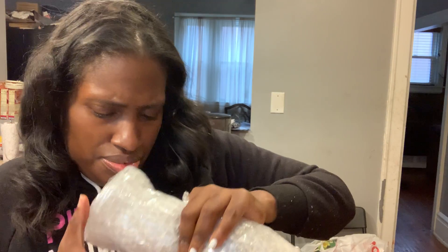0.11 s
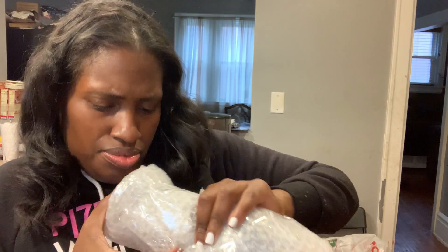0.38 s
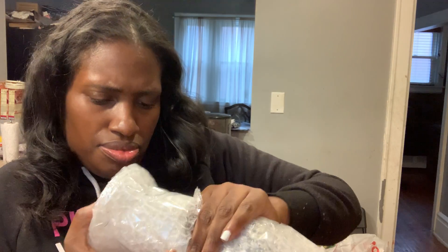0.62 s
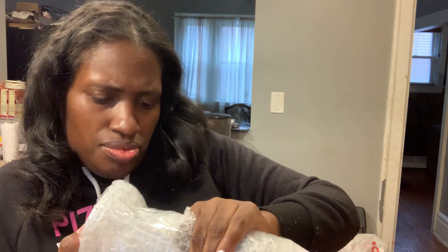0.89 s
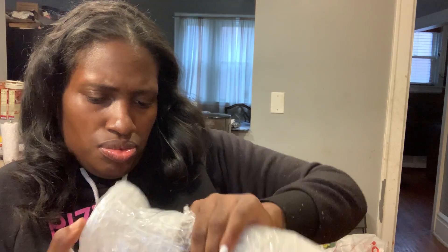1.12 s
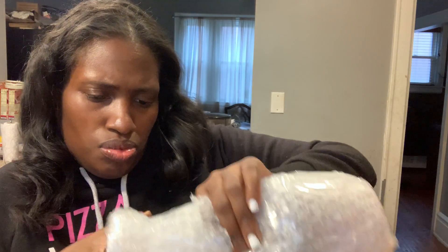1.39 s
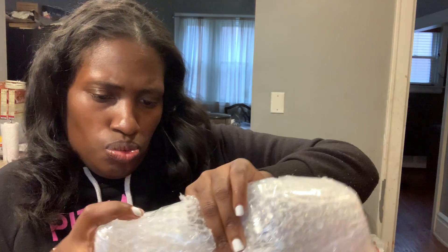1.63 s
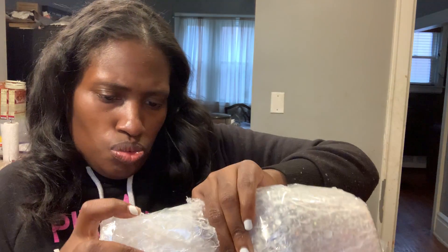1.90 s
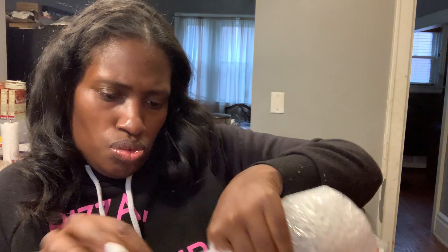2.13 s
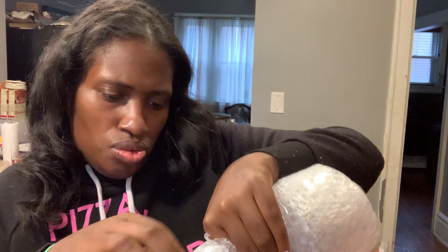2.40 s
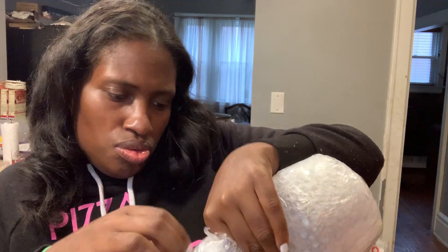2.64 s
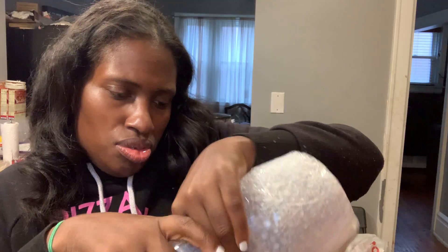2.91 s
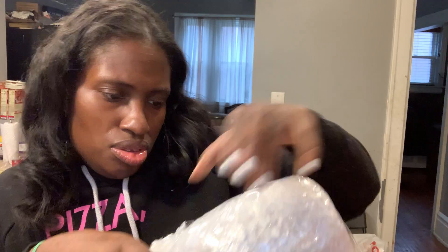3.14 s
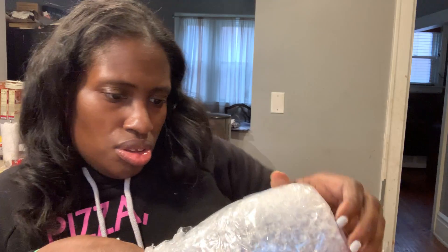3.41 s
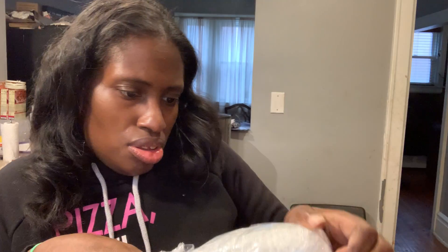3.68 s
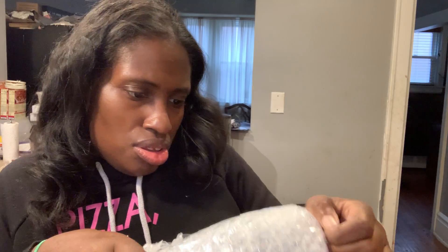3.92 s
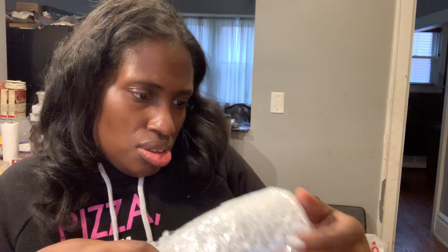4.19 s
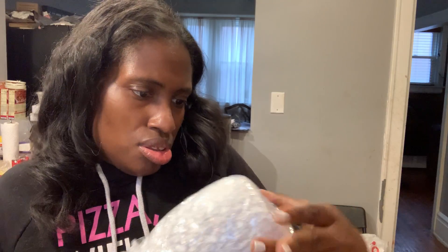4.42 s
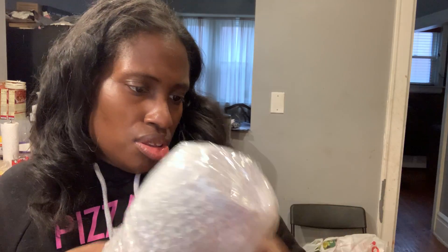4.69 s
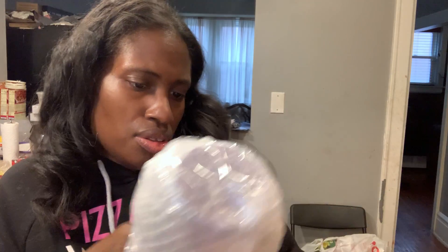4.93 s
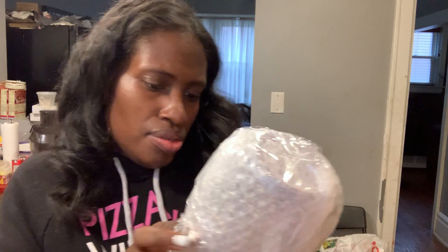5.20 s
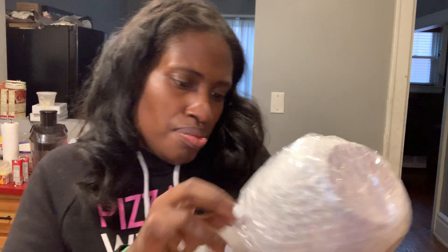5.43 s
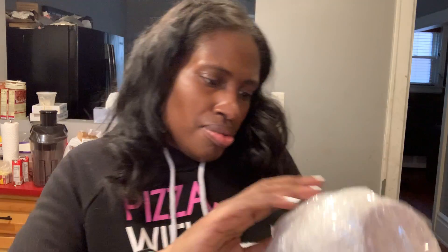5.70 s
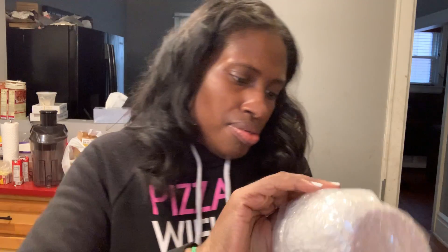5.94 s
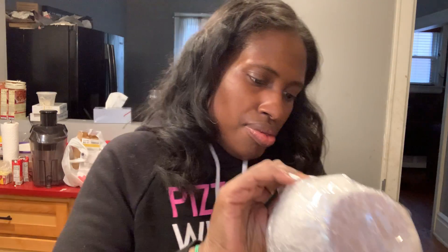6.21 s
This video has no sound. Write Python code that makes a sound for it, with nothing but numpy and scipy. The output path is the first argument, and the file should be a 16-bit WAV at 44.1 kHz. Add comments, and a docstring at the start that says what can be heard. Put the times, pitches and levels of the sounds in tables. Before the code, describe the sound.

Hands unwrap an object covered in bubble wrap, close to the microphone in a small, dry room. Bright rustling comes in short uneven bursts, full of tiny crackles and sharp snaps. Dull little pops and gritty finger rubs mix in, and the object bumps the table with low thuds. Near the end the snaps crowd together and grow loudest.

```python
"""Hands pull bubble wrap off an object on a table, close to two microphone ports in a small room.
From the start the film rustles, thousands of tiny cracks fused with hiss, as the object rubs the table: noise
in table and object resonances. Sharp snaps (noise bursts) and dull pops (damped tones) join at once.
Gritty rubs over the bubbles (narrow noise) follow from 0.4 s and knocks on the table (low damped tones)
from 0.7 s to 5.1 s. Loud snaps crowd together from 5.8 s to the end."""
import sys
import numpy as np
from scipy import signal
from scipy.fft import rfft, irfft
from scipy.io import wavfile
from scipy.ndimage import uniform_filter1d

SR = 44100
rng = np.random.default_rng(int(sys.argv[2]) if len(sys.argv) > 2 else 0)


def transcribe(u):
    """Save the signal u as a 16-bit wav file named by the first command-line argument.

    u: samples, shape (n,) or (channels, n), limited to [-1, 1]; the rate is SR.
    q: integer samples, one column per channel.
    """
    v = np.clip(np.atleast_2d(u).T, -1, 1)
    q = np.round(v * 32767).astype(np.int16)
    wavfile.write(sys.argv[1], SR, q)


def natural_amplitude(level_db):
    """Convert a level in decibels to a linear amplitude factor, elementwise."""
    exponent = np.asarray(level_db, float) / 20
    return 10 ** exponent


N = 278712

# Colour of the film up to 15700 Hz; the last three rows are a steep treble cut, not the film's own colour.
# Each row: frequency in Hz, relative level in dB.
FILM_AND_CUT = [(200, -16), (500, -10), (1300, -4), (1700, -4), (3000, 1.5), (4900, 3), (6500, -0.5),
                (9000, 9), (12000, 6), (14000, 7), (15700, 6), (16100, -63), (16800, -55), (17100, -56.5)]
# The two microphone ports. Each row: frequency in Hz, phase by which the right leads in radians,
# wander of that lead in radians, left minus right level in dB.
PORT_RESPONSE = [(40, .7, .3, -2.5), (90, .65, .3, -2.5), (170, .5, .3, -.3), (300, .6, .6, 0),
                 (700, 1.1, 1.0, -5.5), (1500, 1.2, .7, -3), (3000, 2, .8, -1.5), (4600, 2.2, 1.2, -.5),
                 (5800, 4.7, 1.1, -.7), (7300, 4.3, .35, 0), (8200, 3.5, .05, 0), (9000, 3.14, .02, 0),
                 (9800, 2.7, .06, 0), (11500, 1.6, .35, 0), (14000, 0, .12, 0), (16000, -.9, .3, 0)]


def evened(x):
    """Scales to rms 1."""
    return x / np.sqrt(np.mean(x ** 2) + 1e-20)


def curves(rows):
    """Each dB column as a gain for every sample."""
    s, *columns = np.transpose(rows)
    return natural_amplitude([np.interp(np.arange(N) / SR, s, c) for c in columns])


def add(mix, s, sound):
    """Mixes a sound in at time s."""
    part = mix[max(round(s * SR), 0):][:len(sound)]
    part += sound[:len(part)]


def swells(steady, s, levels_db, rise, fall):
    """Adds in power, to each steady gain, swells that climb to a peak and sink from it at a constant dB rate."""
    t = np.arange(0, N / SR + .002, .001)
    late = t - s[:, None]
    rise, fall = rise.clip(.001)[:, None], fall.clip(.001)[:, None]  # 1 ms at the least
    shape = natural_amplitude(-40 * np.where(late < 0, -late / rise, late / fall))  # in power: 20 dB per rise or fall
    power = natural_amplitude(2 * np.asarray(levels_db)) @ shape
    return np.sqrt(steady ** 2 + [np.interp(np.arange(N) / SR, t, p) for p in power])


def film_parts(x, colour=FILM_AND_CUT):
    """Filters x by a colour curve and splits it into dull, middle and bright parts."""
    size = x.shape[-1]
    hz = np.fft.rfftfreq(size, 1 / SR) + 1
    f, db = np.transpose(colour)
    low, high = (1 / (1 + (hz / edge_hz) ** 4) for edge_hz in (1600, 7000))
    spectrum = rfft(x) * natural_amplitude(np.interp(np.log(hz), np.log(f), db))
    return np.array([irfft(spectrum * share, size) for share in (low, high - low, 1 - high)])


def stirring():
    """Gains of the dull, middle and bright rustle: steady handling plus crumples."""
    # Steady handling between crumples. Each row: time in seconds, dull, middle and bright level in dB.
    handling = [(0, -46.5, -68, -58), (.31, -57, -69.5, -74), (.6, -59.5, -55.5, -52.5),
                (1.04, -64, -58, -59), (1.45, -71.5, -69, -76), (1.62, -64, -64, -61),
                (2.03, -63, -67, -79), (2.2, -63.5, -48.5, -61), (2.43, -65.5, -77, -70),
                (2.65, -64, -61.5, -72.5), (2.9, -56.5, -54, -66), (3.27, -65, -59, -65),
                (3.45, -72, -68, -59), (3.65, -67, -47, -58.5), (3.9, -64.5, -66, -74),
                (4.2, -62, -58, -59), (4.6, -63.5, -55, -56), (4.97, -57.5, -54, -58.5),
                (5.42, -60, -55, -55.5), (5.8, -57, -59, -60), (6.04, -55, -46, -54), (6.32, -56, -46, -47)]
    # Crumples of the film. Each row: peak time in seconds, dull, middle and bright level in dB,
    # seconds to rise 20 dB, seconds to fall 20 dB (anything under 0.001 acts as 0.001).
    crumples = [(.0, -45, -53.5, -51, .05, 0.1), (.1, -51, -56, -46, 0.3, 0), (.235, -70, -54, -71, 6, 8),
                (.28, -61, -60, -52, 0.15, 0.2), (.334, -57, -39, -60.5, -0.08, 0),
                (0.391, -31, -51, -49, -0.06, -0.02), (.44, -53.5, -59, -63.5, 0.4, 0.6),
                (.52, -65, -51.5, -60, 0.7, 0.8), (0.675, -52, -63, -64, 0.2, 0.4),
                (.753, -53, -40, -45, -0.1, 0), (0.775, -42, -41.5, -34.5, -0.01, 0.06),
                (0.945, -37.5, -41.5, -36, 0.0659, -0.0144), (1.127, -56, -40, -41, -0.05, 0.03),
                (1.161, -39, -43, -40, 0, 0.06), (1.189, -42, -31, -36, 0.0142, 0.0528),
                (1.228, -31.5, -38, -27, -0.02, -0.0278), (1.274, -43.5, -37, -37.5, 0.09, 0.02),
                (1.315, -27, -38, -49, 0.0048, -0.0143), (1.336, -48, -54, -61.5, -0.12, 0.06),
                (1.481, -51.5, -57, -81, -0.04, 0.03), (1.535, -42.5, -64, -55, 0.04, 0),
                (1.61, -54.5, -61, -59, 0.05, 0.08), (1.695, -64.5, -56, -54, 0, 0.55),
                (1.8, -62.5, -51, -51, -0.08, 0), (2.064, -55.5, -50.5, -53, -0.44, 0.02),
                (2.109, -42, -40.5, -40.5, 0.0157, 0.05), (2.241, -40.5, -41, -33, 0.0447, 0),
                (2.31, -46.5, -51.5, -52, 0.14, 0.01), (2.56, -47, -47.5, -47.5, 0.01, 0.0879),
                (2.68, -53, -55, -55, -0.2, 0.5), (2.728, -45, -40, -53, -0.05, 0),
                (2.812, -54.5, -47.5, -52, -0.3, 0.14), (2.914, -53.5, -52.5, -52, -0.14, 0.23),
                (3.026, -50, -41.5, -43.5, -0.06, 0.3), (3.096, -36, -48.5, -42.5, 0.09, 0.075),
                (3.158, -60, -49, -44.5, -0.1, 0.0755), (3.237, -69, -45, -50, -0.08, -0.05),
                (3.299, -70, -40, -39, -0.04, 0.06), (3.348, -54, -40.5, -43.5, 0.04, 0.05),
                (3.488, -46, -47, -45, -0.03, 0.2), (3.525, -47, -42, -39.5, 0.02, 0.26),
                (3.593, -42, -37, -33.5, 0.04, 0.08), (3.669, -53.5, -46, -60, -0.25, 0.1),
                (3.796, -59, -62, -55, 0.5, 0.14), (3.95, -67, -50, -48, -0.04, 0.2),
                (4.02, -67, -47.5, -46.5, -0.55, 0.14), (4.054, -42, -33.5, -32.5, -0.04, 0.0638),
                (4.24, -54, -45, -44, 0.04, 0.02), (4.476, -59, -47, -50, 0.28, 0.1),
                (4.63, -59.5, -53, -53.5, 0.1, 1), (4.82, -54.5, -44.5, -47, 0.12, 0.04),
                (4.845, -57, -47, -54, .06, 0.02), (4.87, -55, -45, -49.5, 0.06, 0.15),
                (5.02, -50.5, -49, -45, 0.0631, 0.12), (5.087, -38, -43, -40, 0.06, 0.0254),
                (5.13, -58, -47, -59, 0.13, 0.08), (5.24, -54, -53.5, -52, 0.23, 1.3),
                (5.451, -73, -48, -49, -0.1, 0.9), (5.529, -45, -44, -40, -0.01, 0.03),
                (5.68, -44, -54, -42, -0.11, 0.15), (5.725, -35.5, -49, -53, -0.01, .01),
                (5.856, -42, -34, -39.5, 0.02, 0.1), (5.941, -48, -42, -43, 0.1, 0),
                (6.069, -41.5, -33, -40, -0.0453, 0.47), (6.154, -38, -29.5, -36, -0.0645, 0.08),
                (6.215, -36, -28.5, -40, -0.034, 0.04), (6.318, -62, -44, -60.5, 0.27, -6)]
    s, *levels_db, rise, fall = np.transpose(crumples)
    return swells(curves(handling), s, levels_db, rise, fall)


def patchy(x, depth_db=1.8):
    """The colour drifts at random in patches of time and pitch."""
    hz, t, z = signal.stft(x, SR, nperseg=512, noverlap=384)
    patches = rng.standard_normal((len(t), len(hz))).T
    patches = uniform_filter1d(patches, size=6, axis=0)
    patches = evened(uniform_filter1d(patches, size=24, axis=1))
    return signal.istft(z * natural_amplitude(depth_db * patches), SR, nperseg=512, noverlap=384)[1][:, :N]


def rustle(stir, kinds=24):
    """Countless small cracks, each kind with its own pitch and length, in clumps, fused with a rubbing hiss."""
    cracks_per_s, spread_db, hiss = 2000, 3.8, 0.85
    clumps_per_s, clump_s, clump_db = 120, .008, 1.8

    starts = rng.exponential(1, N) * (rng.random(N) < clumps_per_s / SR)
    clumps = signal.lfilter([1], [1, -np.exp(-1 / (clump_s * SR))], starts)  # sudden start, slow end
    clumps = natural_amplitude((clump_db * evened(clumps - clumps.mean())).clip(-9, 9))

    size = natural_amplitude(spread_db * np.minimum(rng.exponential(1, N), 5))
    size = size * (rng.random(N) < cracks_per_s / SR)
    kind = rng.integers(0, kinds, N)
    t = np.arange(512) / SR
    cracks = np.zeros(N)
    for k, hz in enumerate(np.geomspace(500, 15000, kinds)):
        decay = np.exp(-t * hz / rng.uniform(.5, 1.5))  # dies within a cycle or two
        tone = evened(np.sin(2 * np.pi * hz * t) * decay) * np.sqrt(hz / 4000)
        click = evened(rng.standard_normal(512) * np.exp(-t / .0003))
        cracks += signal.oaconvolve(size * (kind == k), tone + 2.3 * click)[:N]

    # the hiss comes from the whole sheet, so the ports share it only where the lead holds still
    f, _, wander, _ = np.transpose(PORT_RESPONSE)
    shared = np.exp(-3. * np.interp(np.fft.rfftfreq(N, 1 / SR), f, wander) ** 2)
    common, *own = rfft(rng.standard_normal((3, N)))
    spread_hiss = irfft(np.sqrt(shared) * common + np.sqrt(1 - shared) * np.array(own), N)

    x = patchy((evened(cracks) + hiss * spread_hiss) * clumps)
    return sum(gain * evened(part) for gain, part in zip(stir, film_parts(x)))


def ring(x, modes):
    """Sum of resonances, each applied twice, at rms 1."""
    out = 0
    for hz, width, db in modes:
        b, a = signal.iirpeak(hz, hz / width, SR)
        once = signal.lfilter(b, a, x)
        out = out + natural_amplitude(db) * signal.lfilter(b, a, once)
    return evened(out)


def table_rubbing():
    """Lumpy friction noise drives the resonances of the table top and of the hollow object."""
    # Table top, then wrapped object. Each row: resonance in Hz, width of one filter pass in Hz, relative dB.
    boom_modes = [(58.2, 19.4, 2), (89.5, 11.8, -0.5), (113.4, 37, -10)]
    hollow_modes = [(197.3, 37.6, -3.5), (245, 44, 0), (300, 51, 0), (390, 112, -7)]
    # Resting contact with the table. Each row: time in seconds, boom level in dB, hollow ring level in dB.
    resting = [(0, -59, -63.5), (.65, -54.5, -76), (1.05, -50, -63), (1.2, -72, -69), (1.45, -78, -65),
               (2.0, -64, -66), (2.4, -56.5, -57), (2.85, -62, -72), (3.35, -59, -61.5), (3.9, -53.5, -69),
               (4.5, -65, -64.5), (5.0, -58, -65.5), (5.2, -53, -61), (5.55, -59.5, -57),
               (6.32, -63.5, -55)]
    # Shoves across the table. Each row: peak time in seconds, boom level in dB, hollow ring level in dB,
    # seconds to rise 20 dB, seconds to fall 20 dB (anything under 0.001 acts as 0.001).
    shoves = [(.0, -30.5, -45, .05, 0.06), (.23, -53.5, -60, 3, -0.2), (.37, -70, -50, 0.2, 0.5),
              (.56, -51, -70, .01, 2), (0.684, -29, -46, -0.03, -0.05), (.78, -53, -48, 0.2, 0.2),
              (.9, -51, -44, -0.26, 0.13), (0.927, -51, -43, -0.08, 0.08), (1.0, -52.5, -70.5, 0, -0.5),
              (1.264, -40, -27, 0.0136, 0.0944), (1.29, -47, -42, 0.07, -0.08),
              (1.318, -34, -35.5, 0.08, 0.07), (1.49, -59, -53, 0.9, 0.27), (1.539, -35.5, -47, 0, 0.08),
              (2.23, -32.5, -43, 0.02, 0.1267), (2.3, -39.5, -55.5, -0.03, 0),
              (2.55, -59, -50.5, 0.05, 0.2821), (2.73, -51, -44.5, 0.06, 0.02),
              (2.938, -36.5, -45.5, -0.1, 0.08), (3.1, -52, -56.5, -0.2, 0.7),
              (3.54, -41.5, -46, -0.02, 0.25), (3.63, -43.5, -41, -0.26, 0.1), (3.69, -53, -58.5, .01, 0.3),
              (3.73, -59.5, -69, 1.5, 0), (4.07, -54, -52, 0.1, 0.2), (4.24, -51.5, -57, -0.4, 0.04),
              (4.35, -47.5, -84, 0.2, 0.16), (4.91, -56, -60, 0, -0.3), (5.078, -29.5, -38, -0.09, 0.13),
              (5.83, -46.5, -73, 0.2, 0.15), (6.04, -55, -76, 1.2, -1.5), (6.15, -62, -50, -0.9, -0.7)]
    lumps = natural_amplitude(1.14 * evened(uniform_filter1d(rng.standard_normal((2, N)), 900)))
    drive = rng.standard_normal((2, N)) * lumps
    s, *levels_db, rise, fall = np.transpose(shoves)
    boom, hollow = swells(curves(resting), s, levels_db, rise, fall)
    return boom * ring(drive[0], boom_modes) + hollow * ring(drive[1], hollow_modes)


def room(x, turn_s=.11):
    """Sparse taps, treble dying first; three random echoes blend in turn so no fixed colouring builds up."""
    # Reverberation of the small room. Each row: frequency in Hz, time to fall 60 dB in seconds.
    decay_times = [(300, 0.14), (2000, 0.23), (6000, 0.094), (14000, 0.043)]
    taps = np.zeros((3, SR // 2))
    slots = np.arange(200, SR // 2 - 20, 20)
    at = slots + rng.integers(0, 20, (3, len(slots)))
    np.put_along_axis(taps, at, rng.choice([-1., 1.], at.shape), 1)
    hz, t, z = signal.stft(taps, SR, nperseg=256)
    f, t60 = np.transpose(decay_times)
    fade = natural_amplitude(-60 * t / np.interp(hz, f, t60)[:, None])
    tails = signal.istft(z * fade, SR, nperseg=256)[1]
    phase = np.arange(N) / SR / turn_s + np.arange(3)[:, None]
    turns = np.cos(np.pi * phase / 3) * np.sqrt(2 / 3)  # the three powers always sum to 1
    return signal.oaconvolve(x * turns, tails / np.linalg.norm(tails[0]), axes=1).sum(0)[:N]


def crease_flips(rows, crack_s=0.00039, shiver_s=0.0048, shiver_db=-12):
    """A crease flips: a crack under a millisecond, then a short shiver; duller parts last longer."""
    # Treble cut for the snaps, which reach higher than the rustle. Each row: frequency in Hz, relative dB.
    snap_cut = [(16700, -30), (17100, -48)]
    out, lead = np.zeros(N), 256
    t = (np.arange(2048) - lead) / SR
    noise = rng.standard_normal((len(rows), 2048))
    noise[:, lead] = 4.5  # the flip itself
    parts = []
    for k, longer in enumerate((2.6, 1.4, 1)):  # dull, middle, bright
        rise = np.exp(np.minimum(t, 0) / (0.079 * crack_s * longer))
        crack = np.exp(-t.clip(0) / (crack_s * longer))
        shiver = natural_amplitude(shiver_db) * np.exp(-t.clip(0) / (shiver_s * longer))
        part = film_parts(noise * rise * (crack + shiver), FILM_AND_CUT[:-3] + snap_cut)[k]
        parts.append(part / abs(part).max(1, keepdims=True))
    for k, (s, bright_db, middle_db, dull_db) in enumerate(rows):
        sound = sum(natural_amplitude(db) * p[k] for db, p in zip((dull_db, middle_db, bright_db), parts))
        add(out, s - lead / SR, sound)
    return out


def loud_snaps():
    """The loud snaps of the film, as creases flip."""
    # Each row: time in seconds, bright, middle and dull peak in dB.
    snap_rows = [(.0367, -12, -42, -50), (.071, -25, -42.5, -44), (.0752, -24, -27.5, -29.5),
                 (.1054, -18, -32, -39), (.228, -55, -22.5, -23.5), (.2739, -25, -38.5, -54),
                 (.3272, -39, -13.5, -60.5), (.3317, -27, -25, -34), (.3685, -26, -24, -31),
                 (.4219, -20, -47.5, -52), (.5083, -41, -29, -46), (.5186, -22, -28, -42),
                 (.5699, -28, -48, -54), (.5972, -28, -41, -51), (.6774, -21.5, -41, -56),
                 (.7597, -23, -24, -47.5), (.7633, -10, -30, -31), (.7761, -20, -20.5, -57),
                 (.7809, -13, -37.5, -45), (.7875, -30, -31, -51), (.8057, -19, -44.5, -46),
                 (.872, -31.5, -32, -49), (.888, -26, -36, -33.5), (.9423, -26, -14, -30.5),
                 (1.0467, -45, -36, -46), (1.0582, -44, -39, -46), (1.1065, -45, -25, -50),
                 (1.1166, -13.5, -32, -44), (1.1231, -16, -49, -58), (1.1798, -15, -29, -42),
                 (1.1899, -25, -12, -35.5), (1.2215, -30, -21, -24), (1.2362, -27, -34, -24),
                 (1.2737, -23, -27, -27.5), (1.3974, -37, -36, -56), (1.478, -53, -39.5, -39),
                 (1.6368, -39, -42.5, -68), (1.6805, -47.5, -36, -36.5), (1.7104, -17.5, -51, -64),
                 (1.7894, -38.5, -47, -56.5), (1.9433, -34, -33, -45), (2.0576, -25, -27.5, -57),
                 (2.1308, -31, -15.5, -52), (2.1581, -33, -45, -30), (2.2036, -28, -27.5, -31),
                 (2.2202, -18.5, -52.5, -58), (2.2995, -23.5, -40, -30), (2.3408, -23.5, -46, -61.5),
                 (2.4755, -44, -55, -46), (2.4982, -38, -52.5, -39), (2.5166, -7, -19, -26.5),
                 (2.5544, -34, -22, -24), (2.5638, -11, -27, -26), (2.574, -32, -37.5, -29),
                 (2.6731, -28.5, -38, -58), (2.7207, -8.5, -17.5, -23.5), (2.8038, -30, -41, -56),
                 (2.9059, -37, -24.5, -37), (3.0146, -24, -23, -38), (3.0379, -38, -25, -30),
                 (3.0697, -9, -40, -32), (3.1455, -27, -23, -32.5), (3.2298, -34, -20, -39),
                 (3.2888, -33, -37.5, -63), (3.3581, -24, -31, -39), (3.3754, -28, -32, -66),
                 (3.4786, -34, -39, -37), (3.653, -9, -17, -36), (3.6862, -30, -19.5, -49),
                 (3.741, -14.5, -22, -63), (3.7944, -15, -33.5, -37), (3.9502, -31, -45, -34.5),
                 (3.9777, -23.5, -46, -57.5), (4.0176, -23, -29, -54.5), (4.0213, -19, -23, -53.5),
                 (4.031, -11, -31, -34), (4.0491, -14, -16, -37), (4.0552, -15, -14, -58),
                 (4.0706, -16, -36, -27), (4.0902, -41, -18, -59), (4.148, -41, -41, -35),
                 (4.2269, -32, -24.5, -42), (4.2427, -39, -27, -35.5), (4.3143, -27.5, -55.5, -46),
                 (4.362, -43.5, -27.5, -45), (4.4785, -24, -50, -52.5), (4.6772, -43, -22.5, -51),
                 (4.7707, -22, -41, -37), (4.8604, -8.5, -27, -40), (4.8641, -12, -29, -29.5),
                 (4.91, -40, -30.5, -31), (5.0777, -13, -18.5, -36), (5.1351, -15, -21.5, -31),
                 (5.3296, -27, -33.5, -74.5), (5.402, -37, -48, -51), (5.4476, -33, -44, -50),
                 (5.5603, -38, -43.5, -37), (5.645, -27, -32, -40), (5.6018, -35, -45, -59),
                 (5.6716, -1.5, -57, -70), (5.7897, -42, -43, -62), (5.8388, -18, -20, -45),
                 (5.8449, -30, -14.5, -38), (5.8516, -11, -26, -44), (5.858, -32, -22, -46),
                 (5.8652, -31.5, -9.5, -27), (5.9215, -18, -28.5, -59), (5.929, -22, -12, -53),
                 (5.9432, -26, -15, -38), (6.0427, -23, -39, -38), (6.0648, -32, -15, -19),
                 (6.0843, -34, -34.5, -21), (6.1364, -22, -22, -43), (6.142, -22, -13, -37),
                 (6.1465, -12, -10, -20), (6.201, -27, -8, -24), (6.2083, -34, -9.5, -20),
                 (6.2369, -18, -21, -44), (6.2854, -28, -41, -35), (6.3101, -31, -14, -35),
                 (6.3163, -34, -13, -26)]
    return crease_flips(snap_rows)


def ticks(stir, per_s=90):
    """Small snaps at random moments, stronger when the film is stirred more, each with its own colour."""
    base_db = (-40.5, -55, -49.5)  # bright, middle and dull peak over a -52 dB rustle
    follow, spread_db = 0.65, 1  # share of the rustle's swings in dB that they follow; scatter
    s = rng.random(round(per_s * N / SR)) * (N - 1) / SR
    over_db = 20 * np.log10(stir[::-1, (s * SR).astype(int)].T) + 52
    force, colour = rng.standard_normal((len(s), 1)), rng.standard_normal(over_db.shape)
    scatter = (.8 * force + .6 * colour).clip(-3, 1.4)
    return crease_flips(np.column_stack([s, base_db + follow * over_db + spread_db * scatter]))


def blows(rows):
    """Damped tones with a soft rise."""
    out, t = np.zeros(N), np.arange(SR // 2) / SR
    for s, db, hz, rise, t60 in rows:
        swell = np.sin(np.pi / 2 * np.minimum(t / rise, 1)) ** 2
        decay = natural_amplitude(-60 * np.maximum(t - rise, 0) / t60)
        add(out, s, natural_amplitude(db) * swell * decay * np.sin(2 * np.pi * hz * t))
    return out


def pops():
    """Dull pops of folds and air pockets: damped tones that rise in a millisecond."""
    # Each row: time in seconds, level in dB, pitch in Hz, time to fall 60 dB in seconds.
    pop_rows = [(0.074, -37, 438, 0.046), (0.227, -21.5, 1880, 0.0055), (.232, -30.5, 553, 0.018),
                (0.331, -29, 1240, 0.00623), (0.368, -33, 1290, 0.0078), (0.386, -32.5, 536, 0.028),
                (.396, -33, 1390, 0.011), (0.751, -27, 2060, 0.015), (.782, -41, 4050, .012),
                (.897, -36, 1300, .008), (1.082, -40, 1530, 0.0067), (1.171, -34, 1000, 0.02),
                (1.202, -29, 550, 0.008), (1.22, -31, 584, 0.01493), (1.229, -29, 860, 0.0093),
                (1.253, -18, 480, 0.0058), (1.272, -28, 1080, 0.017), (1.288, -33, 800, 0.014),
                (1.311, -28, 735, 0.021), (1.318, -28.5, 1400, 0.018), (1.33, -37, 1060, 0.01),
                (1.524, -34, 516, 0.019), (1.608, -40.5, 770, 0.01), (2.058, -32, 630, 0.0062),
                (2.089, -32, 740, 0.0098), (2.155, -33.5, 580, 0.014), (2.2, -42, 712.7, 0.032),
                (2.228, -38, 1410, 0.024), (2.298, -40, 780, 0.022), (2.319, -35.5, 940, 0.013),
                (2.5165, -38, 810, 0.0074), (2.5492, -28.5, 830, 0.009), (2.554, -21.5, 597, 0.02),
                (2.564, -31.5, 910, .012), (2.697, -38, 895, .012), (2.7205, -31, 1340, 0.011),
                (2.7215, -29, 670, 0.0073), (2.745, -37, 1480, 0.0099), (2.921, -33, 473, 0.02),
                (2.963, -29.5, 924.5, 0.0059), (2.989, -34, 1334, 0.01), (3.477, -35, 423, 0.019),
                (3.54, -38, 1080, 0.024), (3.575, -35, 796, 0.032), (3.582, -35, 1410, 0.037),
                (3.6, -29.5, 630, 0.024), (3.602, -38, 1060, .025), (3.653, -27, 704, 0.011),
                (3.942, -37.5, 1740, 0.014), (4.013, -46, 1391, 0.01231), (4.032, -35, 1420, 0.02),
                (4.048, -34.5, 646, 0.068), (4.361, -39.5, 1360, 0.004), (4.863, -28.5, 1160, 0.012),
                (5.059, -30.5, 453.7, 0.023), (5.134, -34, 1210, 0.019), (5.524, -36, 930, 0.0068),
                (5.558, -32.5, 1200, 0.016), (5.706, -30, 1220, 0.02), (5.865, -28, 1440, 0.01016),
                (5.898, -33.5, 1030, 0.0073), (5.943, -32, 1390, 0.013), (6.066, -23, 1240, 0.0042),
                (6.084, -27, 1400, 0.042), (6.106, -24, 1400, 0.0074), (6.1466, -18, 663, 0.02),
                (6.1645, -26, 640, 0.011), (6.2082, -31, 1190, 0.011)]
    return blows([(s, db, hz, .001, t60) for s, db, hz, t60 in pop_rows])


def rubs():
    """Fingers rub over the bubbles: gritty noise in one resonance, swelling fast and fading slowly."""
    # Each row: start in seconds, length in seconds, level in dB before the swell, pitch in Hz,
    # width of one filter pass in Hz.
    rub_rows = [(0.429, 0.15, -49.5, 2100, 900), (.74, .075, -42, 2000, 1300),
                (1.135, 0.12, -44.5, 590, 600), (1.166, 0.1, -41, 2630, 1600),
                (1.304, 0.041, -38, 960, 910), (2.721, 0.049, -43, 1530, 700), (3.04, 0.11, -42, 1190, 700),
                (3.52, 0.16, -44, 1300, 1200), (4.787, 0.1, -48, 1400, 600), (5.0, 0.089, -55, 1150, 600),
                (5.853, .04, -41, 3000, 500), (6.062, 0.042, -42, 1300, 1000),
                (6.14, 0.062, -41.5, 570, 400)]
    out = np.zeros(N)
    shape = len(rub_rows), SR // 4
    grit = rng.standard_normal(shape) * rng.exponential(1, shape)
    for noise, (s, length, db, hz, width) in zip(grit, rub_rows):
        u = np.arange(0, length, 1 / SR) / length
        add(out, s, natural_amplitude(db) * np.sin(np.pi * u ** .7) * ring(noise, [(hz, width, 0)])[:len(u)])
    return out


def knocks():
    """Knocks on the table: low damped tones."""
    # Each row: time in seconds, level in dB, pitch in Hz, rise in seconds, time to fall 60 dB in seconds.
    knock_rows = [(.68, -42, 198, 0.0037, 0.045), (.685, -36, 330, .004, 0.044),
                  (.772, -23, 87, 0.024, 0.2), (.93, -36, 332, 0.012, 0.11),
                  (1.25, -26.5, 102, 0.012, 0.24), (1.252, -29, 300, 0.011, 0.071),
                  (1.256, -26.5, 188, 0.0079, 0.048), (1.322, -32, 177, 0.0041, 0.074),
                  (1.48, -31.5, 96, 0.011, 0.2), (1.484, -41.5, 194, 0.0043, 0.058),
                  (1.53, -31, 276, 0.0059, 0.063), (2.212, -35.5, 108, 0.0058, 0.053),
                  (2.23, -29, 52.69, 0.011, 0.21), (2.232, -39, 296, 0.02, 0.29),
                  (2.246, -29, 296, 0.0043, 0.021), (2.925, -39, 196, .006, 0.043),
                  (3.478, -37.5, 300, 0.008, 0.67), (3.482, -42.5, 415, 0.019, .12),
                  (3.525, -29.5, 281, 0.01, 0.28), (3.578, -23, 291.7, 0.015, 0.13),
                  (3.612, -30.5, 300, 0.0078, 0.1), (3.675, -37, 284, 0.007, 0.061),
                  (5.066, -19.5, 86, 0.0099, 0.15), (5.07, -26, 49.4, .015, 0.14),
                  (5.09, -32, 107, 0.011, 0.081)]
    return blows(knock_rows)


def scene():
    """Film, its echo in the room, and the table."""
    stir = stirring()
    film = rustle(stir) + loud_snaps() + ticks(stir) + pops() + rubs()
    echo = natural_amplitude(-12.0) * room(film.mean(0))
    deep_cut = signal.butter(4, 40, 'highpass', fs=SR, output='sos')  # small ports lose the deepest bass
    return film + echo + signal.sosfilt(deep_cut, table_rubbing() + knocks())


def top_cut(x):
    """Nothing passes above the cut-off."""
    return signal.sosfilt(signal.butter(12, 16980, fs=SR, output="sos"), x)


def record(dry):
    """The ports hear the sound shifted in phase; the shift wanders as the sounding spot moves."""
    hz, t, z = signal.stft(dry, SR, nperseg=256, noverlap=192)
    f, *columns = np.transpose(PORT_RESPONSE)
    wander = np.interp(hz, f, columns[1])[:, None]
    chance = rng.standard_normal((len(t), len(hz))).T
    chance = uniform_filter1d(chance, size=18, axis=0)
    chance = evened(uniform_filter1d(chance, size=3, axis=1))
    side = np.array([-.5, .5])[:, None, None]  # left, right
    turned = z * np.exp(1j * side * wander * chance)
    moved = signal.istft(turned, SR, nperseg=256, noverlap=192)[1][:, :N]
    lead, _, pan_db = (np.interp(np.fft.rfftfreq(N, 1 / SR), f, c) for c in columns)
    port_gain = np.exp(1j * side[:, 0] * lead) * natural_amplitude(-side[:, 0] * pan_db)
    heard = irfft(rfft(moved) * port_gain, N)
    return top_cut(heard)


dry = scene()
out = record(dry)
transcribe(out)
```